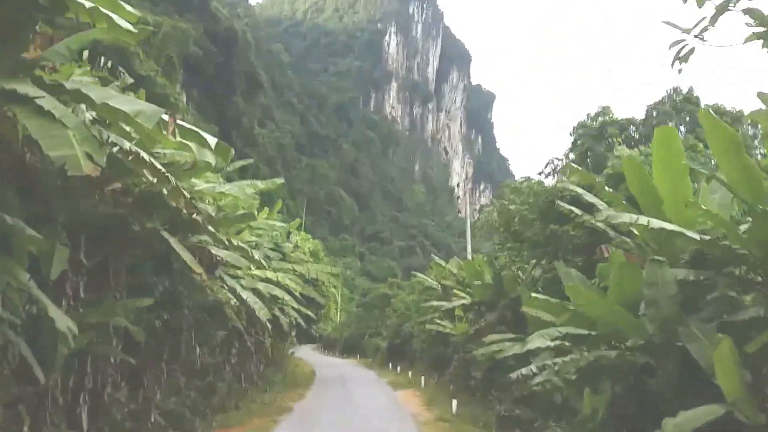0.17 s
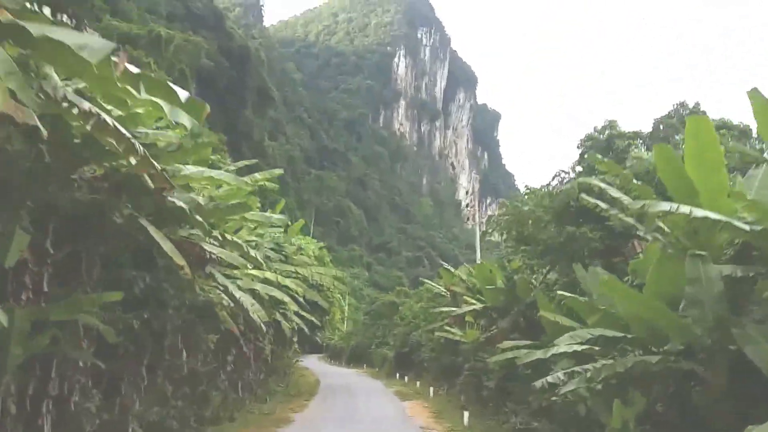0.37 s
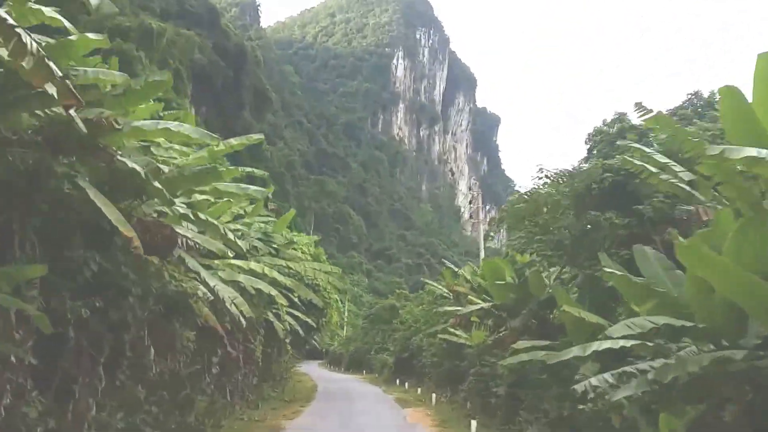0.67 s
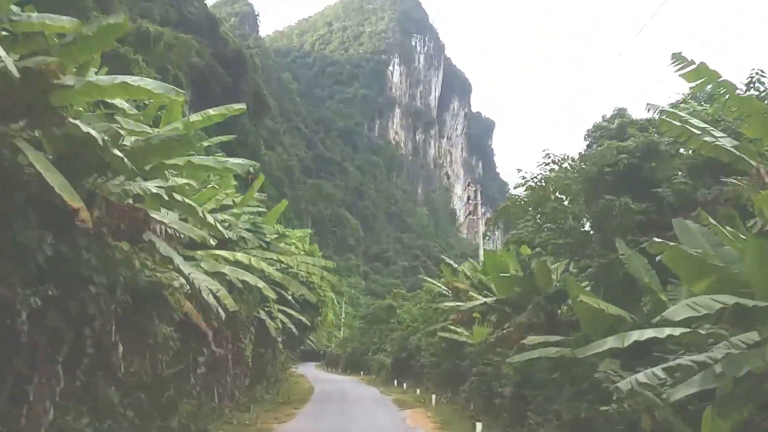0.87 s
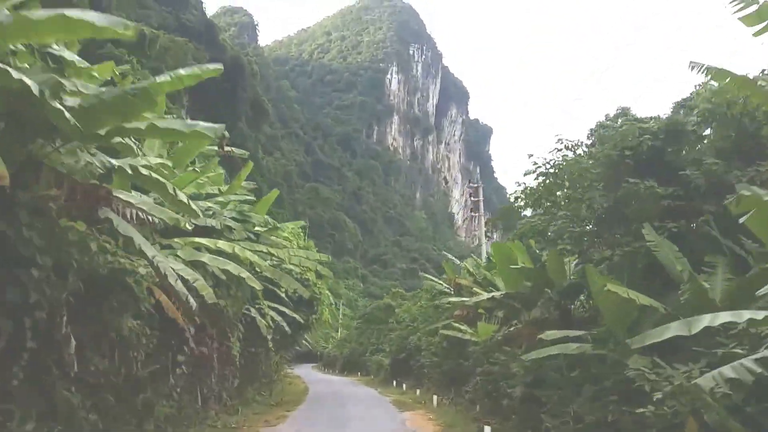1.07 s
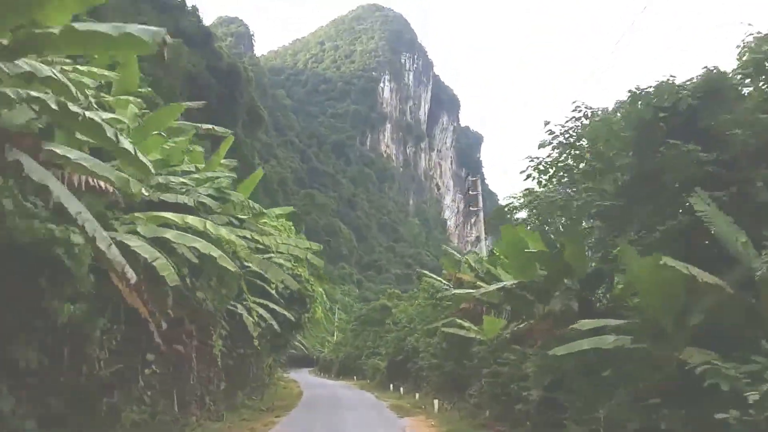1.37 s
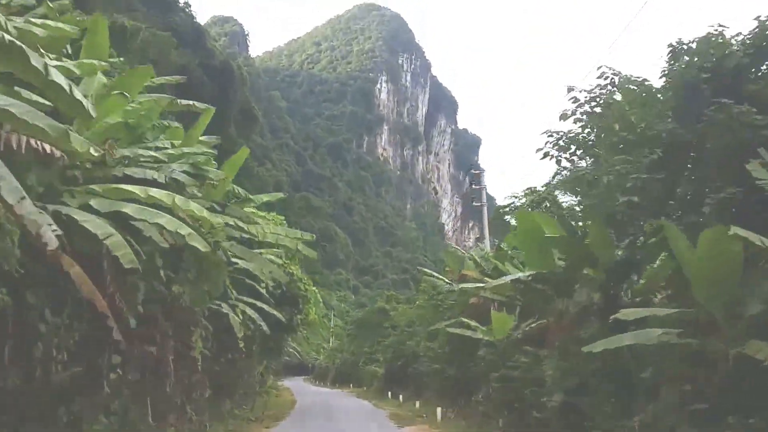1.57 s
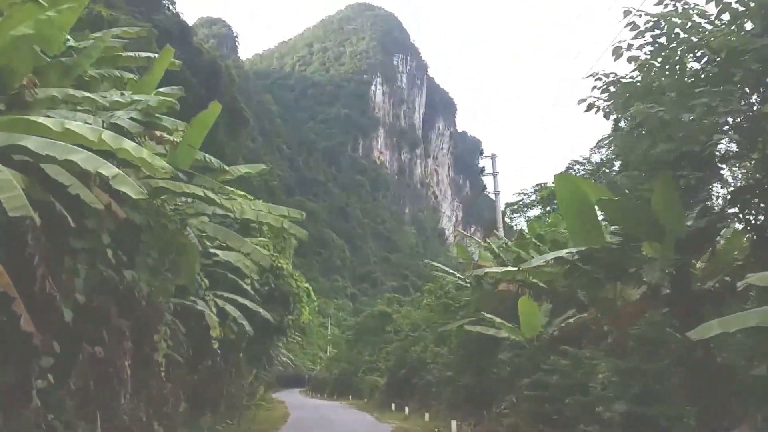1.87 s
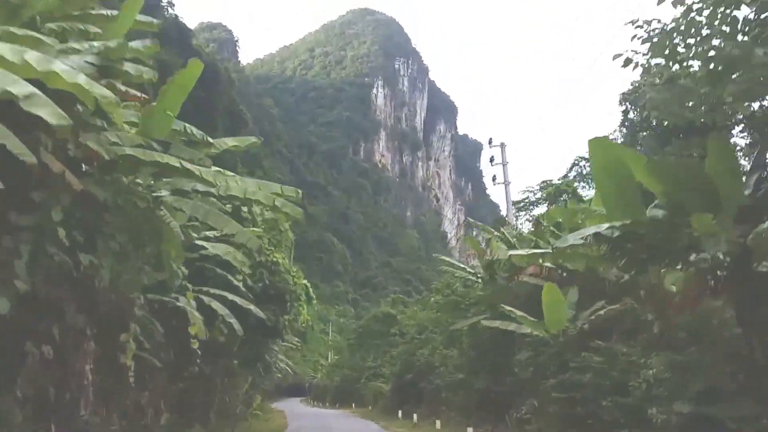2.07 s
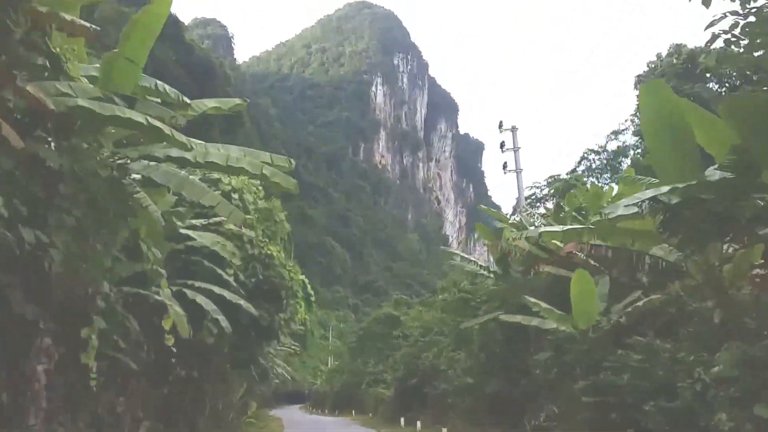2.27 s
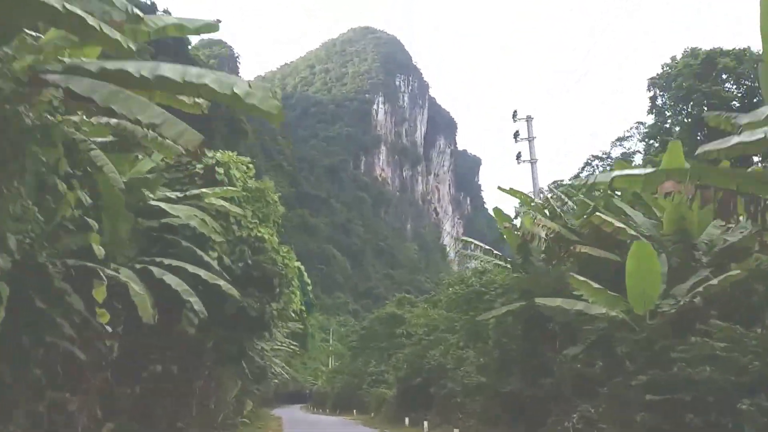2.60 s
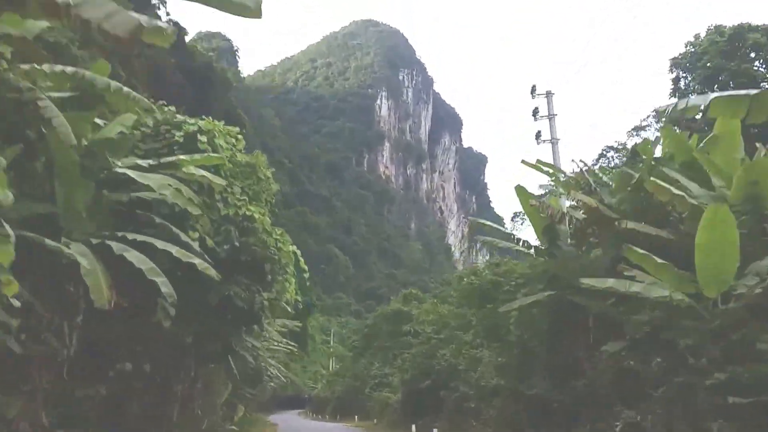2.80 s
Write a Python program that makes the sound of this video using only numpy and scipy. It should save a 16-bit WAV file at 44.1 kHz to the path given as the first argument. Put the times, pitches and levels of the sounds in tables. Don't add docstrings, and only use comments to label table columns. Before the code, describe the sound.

Strong wind tears across a camera microphone on a small motorbike outdoors. Fluttery mid-pitched howls and sharp slaps come in bursts, mostly on the left, over steady hiss, low rumble and a droning single-cylinder engine.

```python
import sys
import numpy as np
from scipy import signal
from scipy.io import wavfile

SR = 44100
rng = np.random.default_rng(int(sys.argv[2]) if len(sys.argv) > 2 else 0)


def to_wav(sig):
    pcm = np.clip(np.atleast_2d(sig), -1, 1) * 32767
    pcm = np.round(pcm).astype(np.int16)
    wavfile.write(sys.argv[1], SR, pcm.T)


def level_to_linear(level):
    exponent = np.asarray(level, float) / 20
    return 10 ** exponent


N = 129654
LEFT_ONLY, RIGHT_ONLY = np.array([[1], [0]]), np.array([[0], [1]])


def curves(rows):
    s, *columns = np.transpose(rows)
    return [np.interp(np.arange(N) / SR, s, c) for c in columns]


def drift(hz):
    r = np.exp(-16 * np.pi * hz / SR)
    slow = signal.lfilter([1], [1, -2 * r, r * r], rng.standard_normal(N // 8 + 6002))[6000:]
    soft = 3 * np.tanh(slow / slow.std() / 2.7)
    return np.interp(np.arange(N) / 8, np.arange(len(slow)), soft)


def bandpass(x, low_hz, high_hz, order=2):
    return signal.sosfilt(signal.butter(order, [low_hz, high_hz], "band", fs=SR, output="sos"), x)


def resonance(x, hz, width):
    r = np.exp(-np.pi * width / SR)
    return signal.lfilter([(1 - r * r) / 2, 0, (r * r - 1) / 2],
                          [1, -2 * r * np.cos(2 * np.pi * hz / SR), r * r], x)


def turbulence(spectrum, patchy_db, fast_hz, count=4):
    hz, db = np.transpose(spectrum)
    edges = 20 * 2 ** np.arange(0, 9.8, 1 / count)
    edges = edges[(edges > hz[0] * .8) & (edges < hz[-1] * 1.25)]
    white = rng.standard_normal((2, N))
    together = drift(fast_hz)
    own = [drift(fast_hz) for k in range(5)]
    out = 0
    for k, (low, high) in enumerate(zip(edges, edges[1:])):
        flicker_db = patchy_db * (0.97 * together + 0.39 * own[k // 2 % 5])
        band_db = np.interp(np.log(low * high) / 2, np.log(hz), db)
        out = out + bandpass(white[k % 2], low, high) * level_to_linear(band_db + flicker_db)
    return out / out.std()


# time in seconds, level in dB.
SHEDDING = [(0.0, -31), (0.45, -22.5), (0.6, -33.5), (0.92, -19.5), (1.07, -28.5), (1.12, -34.5),
            (1.51, -49), (1.65, -39.5), (2.45, -25.5), (2.61, -32), (2.77, -39), (2.94, -25)]
# start in seconds, length in seconds, level in dB,
# pitch shift in octaves.
GUSTS = [(0.111, 0.086, -32.5, 0), (0.244, 0.078, -27.5, .05), (0.305, 0.041, -24.5, -.1),
         (0.362, 0.018, -21, 0), (0.393, 0.095, -38, 0), (0.492, 0.028, -22.5, .1),
         (0.541, 0.079, -19.5, 0), (0.752, 0.055, -23, .03), (.812, 0.021, -18, -.25),
         (.845, 0.047, -27, 0), (0.89, 0.07, -21, 0), (.94, 0.083, -20, .05), (1.488, 0.017, -19, .1),
         (1.539, 0.12, -31, 0), (1.69, 0.21, -31.5, .1), (1.933, 0.068, -28, .1), (2.015, 0.13, -33.5, .05),
         (2.246, 0.018, -17.5, 0), (2.269, 0.015, -21, 0), (2.302, 0.0274, -19, -.1),
         (2.33, .027, -20.5, .12), (2.36, .03, -24, .1), (2.412, 0.00598, -24, 0.3494),
         (2.476, .135, -28, -.12), (2.693, 0.037, -22.5, -.03), (2.735, .015, -23.5, -.15),
         (2.798, 0.014, -28, 0), (2.829, 0.03, -21, -.05), (2.857, 0.085, -21, .05)]


def airflow():
    t = np.arange(N) / SR
    edge_s, gust_boost_db, steady_boost_db = 0.0041, 7, 3.5
    power = level_to_linear(curves(SHEDDING)[0] + steady_boost_db) ** 2
    shift = 0
    for start, length, level_db, octaves in GUSTS:
        gate = np.clip(np.minimum(t - start, start + length - t) / edge_s + .5, 0, 1)
        power = power + (level_to_linear(level_db + gust_boost_db) * gate) ** 2
        shift = shift + gate * octaves
    return power, shift


# centre in seconds, half length in seconds, pitch in Hz, level in dB.
SHRIEKS = [
    (2.873, .004, 3200, -19),
    (2.897, .005, 3550, -25),
    (2.885, .028, 3000, -29),
]


def shrieks():
    t = np.arange(N) / SR
    rasp = drift(850)
    out = 0
    for centre, half, hz, db in SHRIEKS:
        bell = level_to_linear(db) * np.exp(-((t - centre) / half) ** 2)
        out = out + bell * np.sin(2 * np.pi * hz * t) * (1 + 50 * half * rasp)
    return out


# time in seconds, pitch in Hz.
HOWL_PITCH = [(0, 620.6), (.15, 830), (.26, 659.5), (.42, 825.3), (.5, 640), (.62, 618), (.65, 866),
              (.76, 931.5), (.83, 730), (.96, 690), (1.03, 897), (1.3, 742), (1.48, 782), (1.55, 1044),
              (1.88, 860.5), (2.24, 1126), (2.31, 924), (2.94, 1158)]
# frequency in Hz, level in dB per Hz.
SPRAY = [(250, 4.5), (600, 6.5), (1000, 10.5), (1600, -11.5), (2500, -44), (4500, -21.5)]


def howl():
    power, shift = airflow()
    swell = drift(45)
    octaves = shift - .07 * swell + .085 * drift(45)
    phase = 2 * np.pi * np.cumsum(curves(HOWL_PITCH)[0] * 2 ** octaves) / SR
    lock = .5 * np.clip(level_to_linear(-14) / np.sqrt(power), 1, 3)
    width_hz = 150
    chance = .5 * (drift(width_hz) + 1j * drift(width_hz))
    z = (lock + chance) * np.exp(1j * phase) * level_to_linear(1.5 * swell) / np.sqrt(lock ** 2 + .5)
    turn = z / np.abs(z) * np.exp(.6j * drift(116))
    tone = np.real(z * (1 + level_to_linear(-18) * turn + level_to_linear(-25) * turn ** 2))
    shriek = shrieks()
    spray = power ** (1.4 / 2) * turbulence(SPRAY, patchy_db=3.5, fast_hz=60, count=2)
    return np.sqrt(power) * tone / tone.std() + spray + shriek


# start in seconds, peak in dB, pitch in Hz.
SLAPS = [(0.118, -13.5, 730), (0.169, -16.5, 860), (0.236, -17, 670), (0.258, -11.5, 670),
         (0.277, -19, 732), (0.31, -16, 651), (0.334, -11, 674), (0.367, -9, 757), (0.435, -12.5, 829),
         (0.491, -8.5, 670), (0.529, -6, 605), (0.549, -7, 597), (0.723, -24, 810), (0.74, -16, 666),
         (0.756, -17, 990), (0.819, -11.5, 575), (0.844, -7, 700), (0.88, -11, 678.5), (0.946, -5, 680),
         (0.972, -4.5, 700), (1.003, -14, 907), (1.474, -13, 747), (1.488, -10.5, 820), (1.55, -18.5, 990),
         (1.631, -18, 1039), (1.753, -18, 896), (1.846, -16.5, 954), (1.865, -15.5, 918),
         (1.952, -10.5, 894), (2.027, -19.5, 1080), (2.152, -12.5, 1012), (2.247, -7, 1157),
         (2.284, -9.5, 1062), (2.311, -10, 830), (2.41, -11, 1300), (2.49, -10, 934), (2.52, -20, 840),
         (2.54, -16.5, 976), (2.574, -19, 961), (2.694, -16, 989), (2.726, -12.5, 1010),
         (2.797, -13.5, 1063), (2.832, -15, 1060), (2.859, -11, 1170)]


def slaps():
    t60_s, rise_per_s, duck_depth = .03, 650, .75
    puff = bandpass(rng.standard_normal(N), 700, 2100, order=4)
    puff = puff / puff.std()
    t = np.arange(2000) / SR
    shape = level_to_linear(-60 * t / t60_s) * (1 - np.exp(-t * rise_per_s)) ** 2
    out, duck = np.zeros(N), np.ones(N)
    for s, db, hz in SLAPS:
        at = slice(int(s * SR), int(s * SR) + len(t))
        ring = np.sin(2 * np.pi * hz * t)
        out[at] += level_to_linear(db + 10.5) * shape * (ring + level_to_linear(-12) * (hz / 900) ** 2 * puff[at])
        duck[at] *= 1 - duck_depth * shape / shape.max()
    return out, duck


# start in seconds, peak in dB, pitch in Hz.
SNAPS = [(0.3836, -25, 1820), (0.6785, -30, 1640), (0.9742, -18, 1550), (1.0044, -23, 1710),
         (1.1678, -24, 1620), (1.4543, -23, 1860), (1.4737, -19, 1505), (1.4881, -14, 1609),
         (1.6158, -32, 1750), (1.6521, -20.5, 1829), (1.9535, -24, 1650), (1.992, -25, 1744),
         (2.2489, -24, 1960), (2.284, -27, 1940), (2.305, -13, 1739), (2.4814, -25, 2070),
         (2.6979, -19, 2079), (2.7854, -28, 1540), (2.8291, -18, 1577), (2.8715, -17, 1930)]


def snaps():
    t = np.arange(2000) / SR
    decay_s = 0.0021
    out = np.zeros(N)
    for s, db, hz in SNAPS:
        start = int(s * SR)
        out[start:start + len(t)] += level_to_linear(db + 4) * np.sin(2 * np.pi * hz * t) * np.exp(-t / decay_s)
    return out


# centre in seconds, half length in seconds, level in dB.
RIGHT_GUSTS = [(0.745, 0.021, -25), (0.903, 0.042, -36), (1.149, 0.071, -29), (2.004, 0.032, -34),
               (2.368, 0.034, -20), (2.599, 0.085, -20), (2.774, 0.063, -21.5)]
# frequency in Hz, level in dB per Hz.
TEAR = [(90, -31), (200, 6), (500, -4), (1000, -16.5), (2000, -32), (3500, -44)]


def tearing():
    t = np.arange(N) / SR
    level = sum(level_to_linear(db) * np.exp(-((t - centre) / half) ** 2) for centre, half, db in RIGHT_GUSTS)
    return level * turbulence(TEAR, patchy_db=2.0, fast_hz=30, count=2) * RIGHT_ONLY


# time in seconds, firings in Hz, level in dB.
ENGINE = [(0, 33.21, -5.5), (.5, 35.4, -3), (.92, 36.79, 0), (1.06, 37.28, 2), (1.25, 37.69, -3.5),
          (1.5, 38.35, -4), (2.2, 39.96, -3.5), (2.94, 40.5, -3.5)]


def firing():
    first_firing_s = .018
    turns = np.cumsum(curves(ENGINE)[0] * (1 + 0.00629 * drift(7.5))) / SR
    return 2 * np.pi * (turns - first_firing_s * ENGINE[0][1])


# multiple of the firing rate, left level in dB, right level in dB,
# change in dB per Hz of firing rate.
EXHAUST = [(2, -20.5, -32, 1.5), (3, -32.5, -40, 2.5), (4, -24, -31, -0.97), (5, -25, -28.5, -1.7),
           (6, -35.5, -29, 1.5), (8, -39.5, -38.5, 1.5), (10, -33.5, -35, 0)]


def engine(phase):
    hz, db = curves(ENGINE)
    orders = 0
    for k, left_db, right_db, slope in EXHAUST:
        tone = np.sin(k * phase + rng.uniform(0, 1)) * level_to_linear(slope * (hz - hz.mean()))
        orders = orders + tone * level_to_linear(np.array([[left_db], [right_db]]))
    return level_to_linear(db) * orders + whine(phase)


def whine(phase):
    swell = np.exp(-((np.arange(N) / SR - 1.85) / .35) ** 4)
    return level_to_linear(-29) * swell * np.sin(23 * phase) * np.array([[1], [.12]])


# frequency in Hz, level in dB per Hz.
BUFFET_LEFT = [(22, -13.5), (70, -4.5), (170, 1.5), (300, -7), (450, -10), (800, -14), (1200, -19),
               (2000, -20.5)]
BUFFET_RIGHT = [(22, -13), (70, 0.5), (150, -2), (300, -18.5), (500, -17), (1000, -27), (2000, -35)]


def buffeting(left_db, right_db, phase):
    left = level_to_linear(-18.5 + left_db) * turbulence(BUFFET_LEFT, patchy_db=1.5, fast_hz=12.5, count=2)
    right = level_to_linear(-22.5 + right_db) * turbulence(BUFFET_RIGHT, patchy_db=1.5, fast_hz=12.5, count=2)
    return np.array([left, right]) * (1 + 0.25 * np.cos(phase))


# start in seconds, level in dB, pitch in Hz,
# side (0 left, 1 right).
THUMPS = [(1.512, -8, 110, 1), (1.53, -10, 170, 0), (1.995, -8, 200, 0), (2.075, -7, 90, 0),
          (2.416, -9, 150, 0), (2.885, -8, 170, 0)]


def thumps():
    t = np.arange(N) / SR
    out = np.zeros((2, N))
    for s, db, hz, side in THUMPS:
        late = np.clip(t - s, 0, 1)
        out[side] += level_to_linear(db + 8) * np.sin(2 * np.pi * hz * late) * late / .008 * np.exp(-late / .006)
    return out


def tick():
    late = np.arange(N) / SR - 2.2715
    burst = rng.standard_normal(N) * np.exp(-np.clip(late, 0, 1) / .0007) * (late > 0)
    centre_hz = 11500
    return level_to_linear(-27) * bandpass(burst, centre_hz * .8, centre_hz * 1.13) * np.array([[.2], [1]])


# frequency in Hz, level in dB per Hz.
HISS_LEFT = [(1000, -7), (2500, 0), (4300, -2.5), (6000, 0.5), (7200, -8.5), (8500, -71), (11500, -19),
             (15500, -36)]
HISS_RIGHT = [(1000, 0), (2500, 0), (4200, -5), (6500, -62), (8400, -48), (10300, -9), (12300, -11),
              (15000, -27)]
PATCHY_DB = 1.54


def hiss():
    left = level_to_linear(7) * turbulence(HISS_LEFT, PATCHY_DB, fast_hz=24.2, count=6)
    right = level_to_linear(-5.5) * turbulence(HISS_RIGHT, PATCHY_DB, fast_hz=24.2, count=6)
    return np.array([left, right])


# pitch in Hz, width in Hz, level in dB.
WHISTLES = [(8950, 60, -31), (13000, 90, -36)]
# pitch in Hz, width in Hz, level in dB.
CAVITY = [(2600, 180, -6), (3156, 430, -3), (3670, 140, -5.5), (6333, 830, 3)]


def casing():
    t = np.arange(N) / SR
    white = rng.standard_normal(N) * level_to_linear(PATCHY_DB * drift(30))
    out = np.zeros((2, N))
    for hz, width, db in WHISTLES:
        tone = np.sin(2 * np.pi * hz * t + np.array([[0], [1]]))
        out += level_to_linear(db) * tone * np.array([drift(width), drift(width)])
    for hz, width, db in CAVITY:
        ring = resonance(resonance(white, hz, width), hz, width)
        out[0] += level_to_linear(db) * ring / ring.std()
    return out


# time in seconds, gain as hiss level in dB,
# left buffeting in dB, right buffeting in dB.
AIR = [(0.0, -30.5, -1, 2), (0.01, -32, -2.5, -5), (0.13, -33, -2.5, -2), (0.19, -35, -0.5, -3),
       (0.515, -33.5, -0.5, -5.5), (0.525, -40, 4, -6), (0.61, -41, 1.5, 0), (0.69, -36.5, -1.5, 2),
       (0.92, -38.5, -1.5, -3), (0.935, -46.5, 6.5, -11), (1.04, -41.5, -0.5, 0.5),
       (1.65, -38.5, -0.5, -0.5), (1.84, -39.5, 1, 2), (2.22, -36, 1.5, -1.5), (2.23, -43.5, 3.5, -5),
       (2.3, -41.5, 4.5, 3.5), (2.63, -38, -1, -1), (2.94, -43.5, 7, -3.5)]


def scene():
    gain_db, left_db, right_db = curves(AIR)
    ducking_db = gain_db - gain_db.mean()
    phase = firing()
    slap, duck = slaps()
    hiss_gain = level_to_linear(gain_db + np.array([[0], [0.25]]) * ducking_db)
    steady = hiss_gain * (hiss() + casing())
    steady = steady + level_to_linear(0.9 * ducking_db) * (buffeting(left_db, right_db, phase) + engine(phase))
    vortices = howl() * duck + slap + snaps()
    return steady + vortices * level_to_linear(np.array([[0], [-38]])) + tick() + thumps() + tearing()


def band_limit(x):
    return signal.sosfilt(signal.butter(12, 15640, fs=SR, output="sos"), x)


def record(dry):
    ceiling = 1.15
    rounded = ceiling * np.tanh(dry / ceiling)
    return band_limit(rounded * np.clip(np.arange(N)[::-1] / 20, 0, 1))


dry = scene()
out = record(dry)
to_wav(out)
```